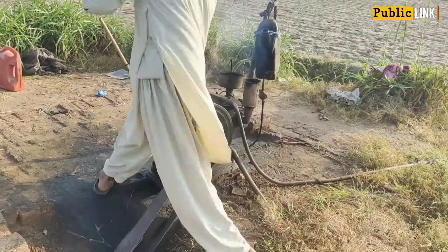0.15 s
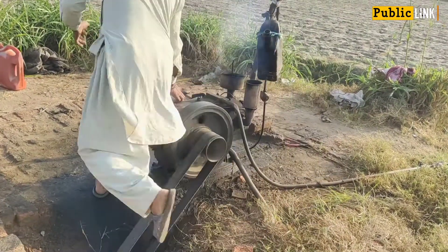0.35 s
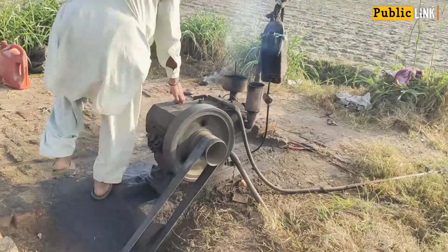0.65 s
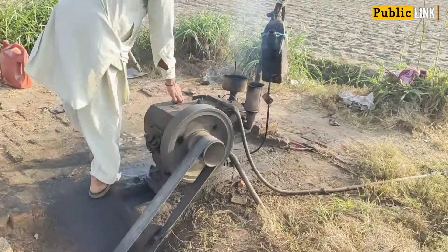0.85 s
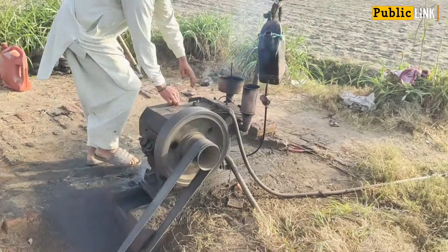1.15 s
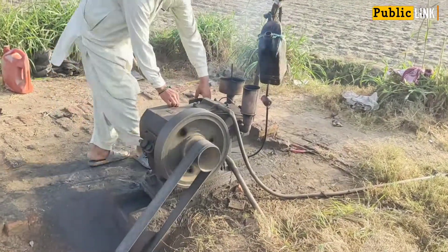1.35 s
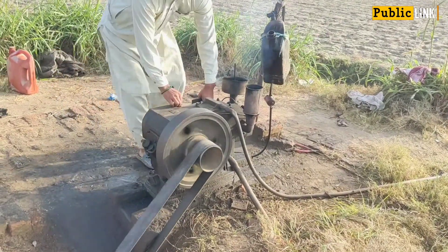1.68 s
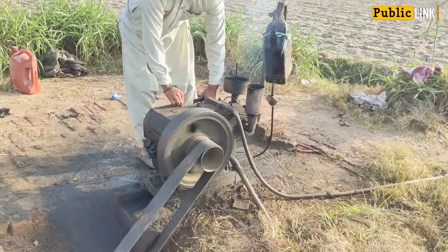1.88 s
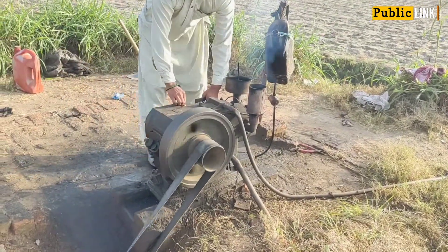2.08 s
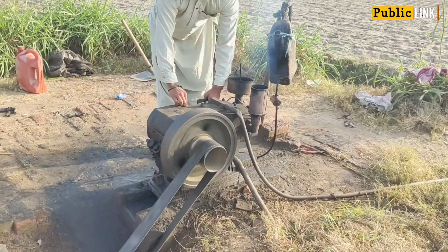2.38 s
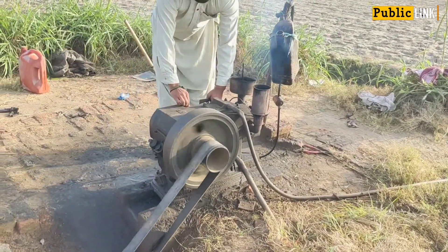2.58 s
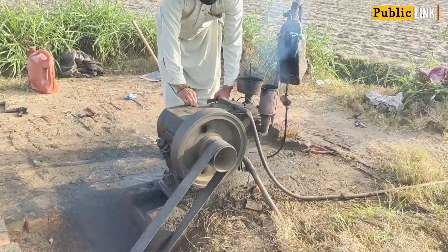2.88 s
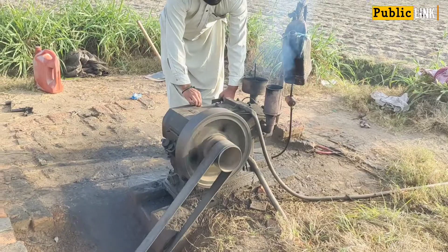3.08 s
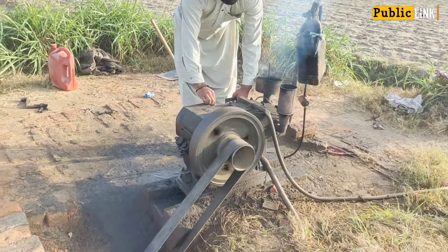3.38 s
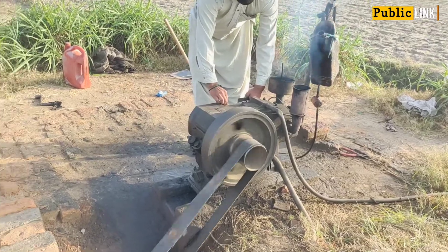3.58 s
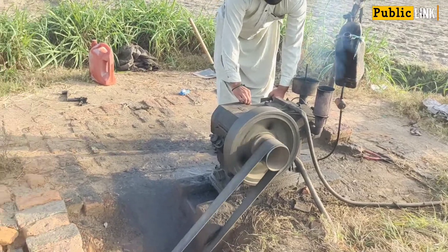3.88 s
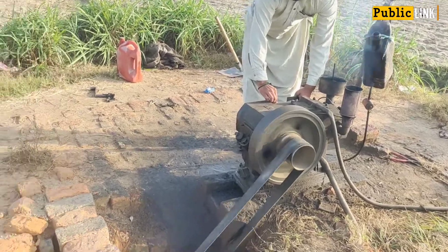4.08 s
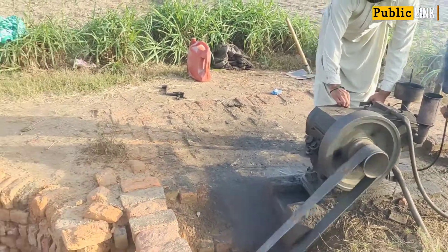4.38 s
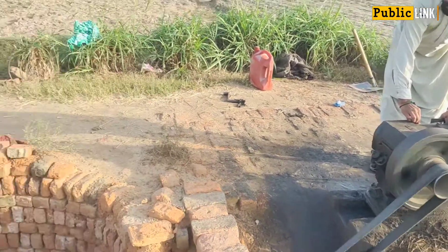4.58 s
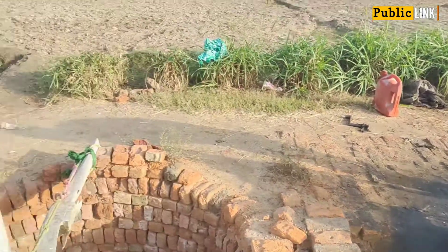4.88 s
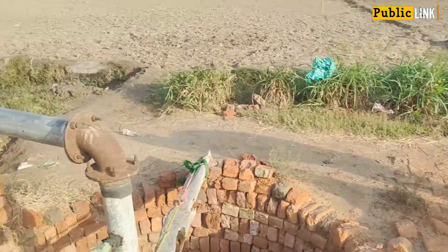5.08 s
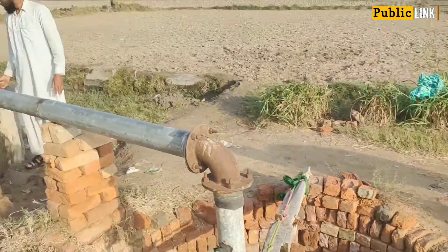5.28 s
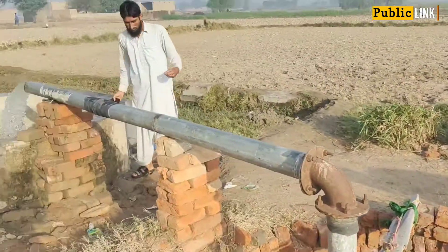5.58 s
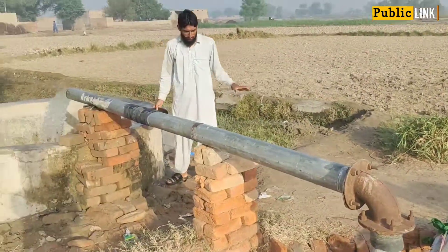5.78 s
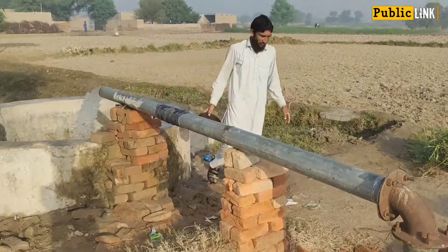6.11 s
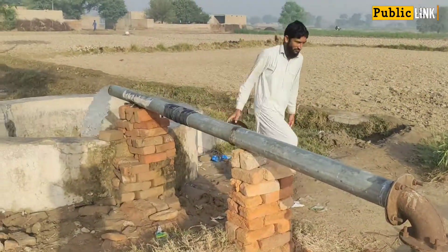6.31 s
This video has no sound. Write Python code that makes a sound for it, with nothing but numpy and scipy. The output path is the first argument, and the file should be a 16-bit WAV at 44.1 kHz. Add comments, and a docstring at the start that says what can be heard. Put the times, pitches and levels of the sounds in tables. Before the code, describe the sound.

Rapid, hollow exhaust barks from an old farm diesel, with iron rattle, thin belt squeals and clacks, then water splashing into a basin.

```python
"""A rapid exhaust beat is heard first: a single-cylinder four-stroke diesel fires nine to ten times a second.
Each cycle rings damped modes at set crank angles: bark, boom, second puff, gulp and knock, with iron clatter.
In an open field it drives a well pump by a flat belt, which squeals as narrow-band noise and clacks at its joints.
The listener walks past the engine to the well, where water pours out as grainy noise.
The right microphone is almost dead, picking up a faint coloured leak, its own noise and early bumps."""
import sys
import numpy as np
from scipy import signal
from scipy.fft import rfft, irfft, next_fast_len
from scipy.io import wavfile
from scipy.ndimage import uniform_filter1d

SR = 44100
rng = np.random.default_rng(int(sys.argv[2]) if len(sys.argv) > 2 else 0)


def to_wav(sig):
    """Store sig (one row per channel, or 1-D mono) as 16-bit WAV at the path in sys.argv[1].

    Samples outside -1..1 are clipped; the rate is SR.
    """
    pcm = np.clip(np.atleast_2d(sig), -1, 1) * 32767
    pcm = np.round(pcm).astype(np.int16)
    wavfile.write(sys.argv[1], SR, pcm.T)  # frames by channels


N = 284445

# Engine speed, with the throttle opened in two pushes and a slight slowing after: t/s, rate/(firings per s)
SPEED = [(0.0, 8.8728), (1.3, 8.8727), (2.35, 9.2902), (2.8, 9.4223), (3.1, 9.7085), (4.2, 9.9512),
         (5.0, 9.9317), (6.45, 9.3805)]


def crank_cycle():
    """Phase is the integral of frequency: engine cycles completed, with exhaust opening near whole numbers."""
    start_cycle = -.6846
    return start_cycle + np.cumsum(in_time(SPEED)[0]) / SR


# Hardest firings, before each sound's own weighting: t/s, bark level/dB, blast level/dB, jet level/dB
HARD_FIRINGS = [(0.303, 2, 2.1, 1.3), (0.528, 3.5, 1.5, 2.6), (0.866, -0.5, 0.99, 3),
                (0.979, 5.5, 1.8, 0.88), (1.652, 5, 2.2, 1.8), (1.873, 4, 3.4, 5.7), (1.983, 2, 5.2, 3),
                (2.843, 1.5, 0.76, 5.4), (2.948, 2.5, 2, 2.0), (3.052, 3, 2.2, 5.2), (3.666, 0.5, 2.3, 2.7),
                (3.97, 2, 9.5, 3.3), (4.273, 0.5, 4.8, 0.1), (4.474, 1.3, 5.3, 1.3),
                (4.675, -1.5, 6.8, 1.4), (4.775, 0, 3.9, 3.4), (5.485, 5.5, 4, 2.3), (5.898, 2.5, 2.2, 4.8),
                (6.108, 4.5, 5, 2.6), (6.425, 2.1, 1.6, 0.9)]


def hard_firings(cycle):
    """Cyclic variation of combustion: extra dB of bark, blast and jet held through each hard cycle."""
    number = np.floor(cycle + .1).astype(int)   # each hold begins just ahead of the exhaust opening
    s, *extra_db = np.transpose(HARD_FIRINGS)
    by_cycle = np.zeros((len(extra_db), number.max() + 2))
    by_cycle[:, number[(s * SR).astype(int)]] = extra_db
    return by_cycle[:, number]


def stroke(cycle, angle, modes, level_db, uneven_db):
    """Impulsive excitation of damped modes: once a cycle a gas pulse rings them, never twice alike."""
    pitch_scatter = 0.025    # standard deviation as a share of the pitch
    steady_t60_s = 0.044     # longer modes scatter less
    mode_uneven_db = 1.5
    at = np.flatnonzero(np.diff(np.floor(cycle - angle)) > 0)
    chance = rng.uniform(-1, 1, 128)[:len(at)]
    force_db = np.broadcast_to(level_db, N)[at] + uneven_db * chance
    out = np.zeros(N + SR)
    for hz, t60, *place_db in modes:
        age = np.arange(int(min(t60, .5) * SR)) / SR
        detune, own = rng.standard_normal((2, 128))[:, :len(at)]
        gains = from_db(force_db + mode_uneven_db * own + np.interp(at / SR, PLACES, place_db))
        decay = from_db(-60 * age / t60)
        pitches = hz * (1 + pitch_scatter * min(1, steady_t60_s / t60) * detune)
        for i, gain, pitch in zip(at, gains, pitches):
            out[i:i + len(age)] += gain * decay * np.sin(2 * np.pi * pitch * age)
    return out[:N]


# Modes of each stroke, relative to that stroke's level: f/Hz, t60/s, then level/dB at each of the four places
# exhaust valve opens
BARK = [(104.7, 0.11, -15.5, -12.5, -13, -13.5), (171.6, 0.053, -14.5, -15, -13.5, -9.5),
        (273.5, 0.029, -14, -7.5, -5, -9), (438, 0.018, -15.5, -14.5, -13.5, -17),
        (561, 0.026, -16, -8.5, -17.5, -35.5), (524, 0.024, -36, -25.5, -14, -12),
        (627, 0.0082, -21, -11, -41, -29.5), (840, 0.024, -17.5, -13, -12.5, -46)]
# silencer
BOOM = [(81.6, 0.085, -32.5, -37, -36, -25.5), (140.5, 0.046, -22.5, -15, -14.5, -23.5),
        (274, 0.055, -36, -27, -40, -32)]
# ring left by the second puff
PUFF = [(168.3, 0.077, -21, -26, -21.5, -16), (249.2, 0.2, -41, -28.5, -24.5, -33.5),
        (433, 0.093, -23, -21, -31.5, -25)]
# air intake
GULP = [(188.5, 0.17, -42, -75, -35, -25), (236, 0.026, -23, -15.5, -13.5, -17),
        (440, 0.054, -35, -40, -29, -47), (626, 0.051, -22, -17, -19.5, -21)]
# combustion
KNOCK = [(158.4, 0.056, -26.5, -20, -20.5, -18.5), (382, 0.025, -21.5, -29, -41, -21),
         (784, 0.048, -23, -18.5, -19.5, -22.5)]


def gas_pulses(cycle, bark_db):
    """Superposition of five modal strokes; gradual valve opening low-passes each pulse."""
    bark = stroke(cycle, -0.0092, BARK, level_db=0.67 * bark_db - 0.5, uneven_db=-0.9)
    boom = -stroke(cycle, 0.1275, BOOM, level_db=4.5, uneven_db=1.0)   # suction behind the gas slug
    puff = stroke(cycle, .2663, PUFF, level_db=1.32, uneven_db=-2.1)
    gulp = stroke(cycle, .556, GULP, level_db=2.5, uneven_db=2.0)
    knock = stroke(cycle, .735, KNOCK, level_db=1.0, uneven_db=2.0)
    rounded = cut(bark + boom + puff + gulp + knock, 832, "low", order=4)
    # a narrow pipe radiates almost no deep bass
    high_pass = signal.cheby2(4, 34, 37, "high", fs=SR, output="sos")
    return signal.sosfilt(high_pass, rounded)


def silencer(x, hz, width_hz):
    """All-pass group delay: the can holds back sound near its resonance for about four milliseconds."""
    b, a = signal.iirpeak(hz, hz / width_hz, fs=SR)
    return x - 2 * signal.lfilter(b, a, x)


# Spectrum of the second puff's smooth pulse: f/Hz, level/dB
PUFF_COLOUR = [(60, -21), (150, -1.5), (500, 2), (780, -0.5), (900, -7), (1100, -22.5), (1500, -31.5)]
# Drive of that pulse at the four places: level/dB
PUFF_DB = [19.6, 22.55, 21.3, 22.5]


def second_puff(cycle, angle, uneven_db):
    """Open-end reflection: the piston pushes out the remaining gas in a pulse that bounces twice in the pipe."""
    clicks = np.append(np.diff(np.floor(cycle - angle)), 0)
    drive = from_db(along_walk(PUFF_DB) + uneven_db * drift(9.2))
    pulse = colour(clicks * drive, PUFF_COLOUR)
    trip_s = 0.003225 * (1 + 0.033 * drift(10))   # mean round trip; the gas is never equally hot
    first_return = -0.91 * delayed(pulse, trip_s)   # inverted by the open end
    second_return = 0.25 * delayed(pulse, 2 * trip_s)
    return pulse + first_return + second_return


# Turbulence spectrum: f/Hz, level/dB per Hz (relative)
RUMBLE_COLOUR = [(25, -18), (42, -32), (65, -22), (120, 8), (180, -4.5), (330, 3.5), (600, -4.5),
                 (850, -5.5), (1100, -14), (1500, -25)]
# Turbulence at the four places: level/dB
RUMBLE_DB = [-30, -29.5, -30.5, -28]


def rumble(cycle):
    """Turbulent flow noise: broadband grains in the pipe, strongest behind the bark."""
    envelope = 5.5 + 2.2 * burst(cycle, 0, 0.2, uneven_db=-2.0)
    return from_db(along_walk(RUMBLE_DB)) * grains(RUMBLE_COLOUR, envelope, grain_db=1.6)


# Short flutter between nearby surfaces along the walk: t/s, delay/s, share reflected
FLUTTER = [(1.0, 0.0022, 0.46), (3.3, 0.002, 0.29), (4.2, 0.0016, 0.12), (4.8, 0.0013, 0.25),
           (5.4, 0.00093, 0.5), (5.9, 0.00088, 0.59), (6.45, 0.00081, 0.61)]


def flutter(x):
    """Comb filtering: quick inverted echoes make a hollow honk that rises as their path shortens."""
    delay, share = in_time(FLUTTER)
    samples, echo, out = np.arange(N), x, x
    for _ in range(12):
        echo = -np.clip(share, 0, .85) * np.interp(samples - delay * SR, samples, echo)
        out = out + echo
    return out


# Dulling of the bark's top on the way to the outlet: t/s, share of the band removed
SHADE = [(4.9, 0.17), (5.5, 0.36), (6.0, 0.79), (6.45, 1)]


def shade(x, hz, width_hz):
    """Band rejection: away from the pipe's mouth the top of the bark is lost."""
    b, a = signal.iirpeak(hz, hz / width_hz, fs=SR)
    return x - np.clip(in_time(SHADE)[0], 0, 1) * signal.lfilter(b, a, x)


# Silencer can and pipe: f/Hz, width of one filter pass/Hz, then level/dB at each of the four places
HUM = [(166, 24, -41.5, -42, -47, -51.5), (257.1, 13.4, -55, -35.5, -38, -45.5),
       (478, 54, -63, -60, -43.5, -46), (665, 52, -46, -42, -51, -40.5)]


def hum():
    """Sustained resonance: narrow noise of the silencer can and its pipe bridges the strokes."""
    return placed_noise(HUM)


def stack_clang(cycle, blast_db):
    """Resonant excitation: a short metallic note of the exhaust stack, clear only under a hard blast."""
    level_db = along_walk([-51, -41.5, -43, -41.5]) + blast_db
    envelope = burst(cycle, 0.024, 0.028, uneven_db=-5.5)
    return from_db(level_db) * envelope * narrow_noise(1814, 160)


# Spectrum of the gas jet: f/Hz, level/dB per Hz (relative)
SIZZLE_COLOUR = [(5000, 2), (6200, -7.5), (7600, -1), (8400, -8.5), (10000, 4.5), (11500, 5.5), (13000, 1),
                 (15500, -1.5)]
# Jet at the four places, before 4 dB is added: level/dB
SIZZLE_DB = [-72.5, -65.5, -68.5, -73.5]


def sizzle(cycle, jet_db):
    """Jet noise: the gas hisses and ticks after the exhaust opens, whistles at the lip and spits when hard."""
    blast = 1.05 * from_db(1.5 * jet_db) * burst(cycle, 0.0044, 0.047, uneven_db=-0.9) ** 2
    firing = 0.15 * burst(cycle, 0.76, 0.036, uneven_db=3.0)
    jet = 0.47 + blast + firing
    smooth_jet = uniform_filter1d(jet, size=220)
    hiss = grains(SIZZLE_COLOUR, smooth_jet * from_db(1.2 * drift(120)), grain_db=1.5)
    # soot and oil drops tick in the jet
    drops = sparse_clicks(per_s=120, weight=jet ** 2, spread_db=4)
    ticks = from_db(-7) * rms_one(colour(drops, SIZZLE_COLOUR))
    lip = burst(cycle, 0, 0.098, uneven_db=7.5) * narrow_noise(12200, 200)
    whistle = from_db(-14) * rms_one(lip)   # thin note at the pipe's lip
    level = from_db(along_walk(SIZZLE_DB) + 4.0 + drift(10))
    return level * (iron(hiss + ticks, t60=0.0099, ring_db=-1.0) + whistle)


# Bursts of second puff, valve seating, injection and firing: start/cycles, rise/cycles, level/dB
CLATTER = [(0.247, 0.036, 0), (.35, 0.031, -1), (.785, 0.02, 6)]
# Clatter spectrum: f/Hz, level/dB per Hz (relative)
CLATTER_COLOUR = [(500, 3), (900, 6.5), (1300, -11.5), (2000, -7.5), (3000, -13), (4300, -22),
                  (5800, -35.5), (8000, -37)]
# Clatter at the four places, before 10 dB is added: level/dB
CLATTER_DB = [-51.5, -47.5, -48, -50]
# Engine block and tinware: f/Hz, width of one filter pass/Hz, then level/dB at each of the four places
BLOCK = [(1007, 110, -47.5, -42, -40.5, -48), (1280, 110, -51, -56, -42.5, -48),
         (1582, 150, -51, -41.5, -49, -46.5)]


def machinery(cycle, blast_db):
    """Structure-borne sound: gears rattle throughout; blast, valves and firing shake the iron and the block."""
    blast = from_db(0.65 * blast_db + 8.0) * burst(cycle, 0.0038, 0.045, uneven_db=1.28) ** 2
    power = 1 + blast ** 2   # 1 is the steady gear rattle
    for angle, rise, db in CLATTER:
        power = power + (from_db(db) * burst(cycle, angle, rise, uneven_db=1.0)) ** 2
    shake = np.sqrt(power)
    level = from_db(along_walk(CLATTER_DB) + 10.0 + 0.37 * drift(7.9) + 1.27 * drift(110))
    rattle = grains(CLATTER_COLOUR, shake, grain_db=-0.5)
    clatter = level * patchy(rattle, patchy_db=2.5, rate=120)
    block = rms_one(shake) * placed_noise(BLOCK)
    return iron(clatter, t60=0.034, ring_db=-5.5) + block + tinware(shake)


# Spectrum of the tinware: f/Hz, level/dB
TINWARE_COLOUR = [(850, -5), (1200, -0.5), (1900, -3.5), (2800, -11), (4000, -18)]
# Tinware at the four places: level/dB
TINWARE_DB = [-47, -43.5, -38.5, -41.5]


def tinware(shake):
    """Random impacts on free resonators: each knock, likelier under hard shaking, rings one small part."""
    clicks = sparse_clicks(per_s=200, weight=shake, spread_db=2.6) * np.sqrt(shake)
    pitches = np.geomspace(880, 4000, 28)   # Hz
    part = rng.integers(0, len(pitches), N)
    rings = sum(ring(clicks * (part == k), hz, t60=37 / hz) for k, hz in enumerate(pitches))
    return from_db(along_walk(TINWARE_DB)) * rms_one(colour(rings, TINWARE_COLOUR))


# Small steel part shaken hard, before its envelope and modes: t/s, level/dB
PINGS = [(1.873, -60), (1.984, -56), (2.631, -57), (2.738, -55), (2.775, -57), (2.843, -53), (2.95, -61),
         (3.054, -53), (3.36, -51), (3.463, -59), (3.611, -55), (3.666, -56), (3.971, -59), (4.074, -56),
         (4.274, -59), (4.375, -58), (4.776, -60)]
# Its modes: f/Hz, width of one filter pass/Hz, level/dB
PING_MODES = [(10300, 350, 1.5), (11100, 350, 1), (12900, 500, -5)]


def pings():
    """Transient resonance: narrow noise in brief strokes gives short, high metallic shivers."""
    modes = sum(from_db(db) * narrow_noise(hz, width) for hz, width, db in PING_MODES)
    return strikes(PINGS, rise=.003, decay=0.0077) * modes


# Belt squeal: f/Hz, width of one filter pass/Hz, level/dB (relative), share of the swell that it follows
SQUEAL = [(4505, 200, 1.5, .2), (5840, 83, -12, 0.7), (7770, 220, -14.5, 0.69), (9320, 250, -7, 0.4),
          (11800, 360, -5, 0.74), (12090, 150, -8, 0.72)]
# Squeal at the four places: level/dB
SQUEAL_DB = [-71.5, -72, -71.5, -86]
# Belt slips: start t/s, length/s, swell above the steady level/dB before each squeal's share
SLIPS = [(0.047, 0.24, 12.5), (0.677, 0.047, 14), (0.8, 0.26, 13), (1.19, .12, 9), (1.587, .11, 4),
         (1.76, 0.13, 5), (2.45, 0.36, 12.5), (3.05, 0.17, 9), (3.35, 0.36, 5), (3.68, .12, 8),
         (4.142, 0.19, 10), (4.776, .12, 4), (5.2, .2, 6), (5.46, .12, 16)]


def belt():
    """Frictional squeal: thin notes, each fluttering on its own, swell whenever the belt slips."""
    t = np.arange(N) / SR
    edge_s = .03
    swell_db = np.zeros(N)
    for start, length, db in SLIPS:
        inside_s = np.minimum(t - start, start + length - t)
        swell_db += db * np.clip(.5 + inside_s / edge_s, 0, 1)
    squeals = np.zeros(N)
    for hz, width, db, follows in SQUEAL:
        level_db = db + follows * swell_db + 3.5 * drift(28)
        squeals += from_db(level_db) * narrow_noise(hz, width)
    return from_db(along_walk(SQUEAL_DB)) * squeals


# Joints slapping on to the pulley and off again, about every fourth cycle, before the envelope: t/s, level/dB
CLACKS = [(.159, -28), (.612, -25), (1.025, -29.5), (1.063, -26.5), (1.482, -29.5), (1.525, -33),
          (1.92, -28.5), (1.957, -25.5), (2.394, -26.5), (2.784, -26), (2.819, -25), (3.196, -30),
          (3.241, -27), (3.612, -27), (3.646, -26), (4.053, -27), (4.42, -30.5), (4.455, -25),
          (5.266, -24.5), (5.644, -27.5), (5.979, -34), (6.059, -28.5), (6.096, -24.5)]
# Rattle spectrum: f/Hz, level/dB per Hz (relative)
RATTLE_COLOUR = [(1000, 8.5), (1900, 7), (2800, -0.5), (4300, -7), (6000, -25), (9000, -24.5)]


def belt_joints():
    """Impact noise: each joint rattles raggedly over the pulley."""
    rattle = patchy(grains(RATTLE_COLOUR, 1, grain_db=1.0), patchy_db=4.0, rate=45)
    clacks = strikes(CLACKS, rise=0.0044, decay=0.0095) * rattle
    return iron(clacks, t60=0.021, ring_db=-6.0)


# Water spectrum: f/Hz, level/dB per Hz (relative)
WATER_COLOUR = [(300, -13), (700, 23.5), (1500, 16.5), (2500, 3), (4500, -51), (9000, -51)]
# Water at the four places: level/dB
WATER_DB = [-62, -54, -46.5, -38]


def water():
    """Splash noise: the jet falls into the basin as many uneven grains."""
    splash = grains(WATER_COLOUR, from_db(0.9 * drift(40)), grain_db=2.0)
    return from_db(along_walk(WATER_DB)) * splash


def yard(x, t60, wet_db):
    """Diffuse scattering: earth, bricks and crops return a short dull tail."""
    age = np.arange(SR // 4) / SR
    tail = rng.standard_normal(len(age)) * from_db(-60 * age / t60) * (age > .003)
    scattered = signal.fftconvolve(x, tail / np.linalg.norm(tail))[:N]
    return from_db(wet_db) * cut(cut(scattered, 510, "high"), 1060, "low", order=4)


# Touches on the right microphone, as click sizes: t/s, level/dB
BUMPS = [(.017, -14), (0.61, -15.5), (0.713, -31)]


def bumps():
    """Impulse response: a touch on the microphone gives a dull damped thud and a short rub."""
    clicks = np.zeros(N)
    for s, db in BUMPS:
        clicks[int(s * SR)] = from_db(db)
    thud = cut(ring(clicks, 170, 0.021), 90, "high", order=1) + .5 * ring(clicks, 390, 0.0067)
    fading = signal.lfilter([1], [1, -np.exp(-1 / (0.06 * SR))], clicks + 1e-18)
    rub = fading * rms_one(cut(rng.standard_normal(N), 220, "low", order=1))
    return -1.6 * thud + from_db(-33.0) * rub


# Response of the weak right microphone to the left sound: f/Hz, level/dB
LEAK = [(40, -54), (150, -48), (500, -47), (800, -40), (1200, -54), (1700, -26), (3000, -40), (6000, -46),
        (15000, -17)]
# Its own noise spectrum: f/Hz, level/dB (relative)
MIC_NOISE = [(25, 10), (100, 15.5), (300, 12), (700, 10), (3000, 10), (6000, 1.5), (15000, -0.5)]


def weak_microphone(left):
    """Transducer response and self-noise: a faint coloured copy, steady noise and the bumps."""
    own_noise = from_db(-62.0) * rms_one(colour(rng.standard_normal(N), MIC_NOISE))
    return colour(left, LEAK) + own_noise + bumps()


# Moments of passing the four places (behind the operator, facing the engine, well rim, outlet pipe): t/s
PLACES = [1.0, 3.4, 4.8, 5.9]


def along_walk(place_db):
    """Position-dependent level: linear interpolation in dB from one place to the next."""
    return np.interp(np.arange(N) / SR, PLACES, place_db)


def placed_noise(modes):
    """Superposed resonances: narrow noises, each with its own level along the walk."""
    return sum(from_db(along_walk(place_db)) * narrow_noise(hz, width) for hz, width, *place_db in modes)


def burst(cycle, angle, rise, uneven_db):
    """Periodic envelope: it swells and dies once a cycle, with a new height each time."""
    age = (cycle - angle) % 1 / rise
    height_db = uneven_db * rng.standard_normal(128)[np.floor(cycle - angle).astype(int)]
    return age * np.exp(1 - age) * from_db(height_db)


def strikes(rows, rise, decay):
    """Transient envelope: single hits with exponential rise and decay in seconds."""
    out, age = np.zeros(N + SR // 10), np.arange(SR // 10) / SR
    shape = (1 - np.exp(-age / rise)) * np.exp(-age / decay)
    for s, db in rows:
        at = int(s * SR)
        out[at:at + len(age)] += from_db(db) * shape
    return out[:N]


def sparse_clicks(per_s, weight, spread_db):
    """Inhomogeneous random impulses: uneven clicks, more frequent where the weight is high."""
    born = rng.random(N) < per_s * weight / np.mean(weight) / SR
    sign = rng.choice([-1, 1], N)
    return born * sign * from_db(spread_db * np.minimum(rng.exponential(1, N), 3))


def grains(points, envelope, grain_db):
    """Amplitude-modulated noise: grains of about a millisecond and uneven size, at unit power."""
    return rms_one(colour(rng.standard_normal(N) * envelope * from_db(grain_db * drift(700)), points))


def iron(x, t60, ring_db):
    """High modal density: briefly ringing modes of castings and tinware, with the broad colour kept."""
    age = np.arange(SR // 10) / SR
    modes = rng.standard_normal(len(age)) * from_db(-60 * age / t60)
    response = 1 + from_db(ring_db) * rfft(modes / np.linalg.norm(modes), 2 * N)
    broad = np.sqrt(uniform_filter1d(np.abs(response) ** 2, size=N // 40))
    return irfft(rfft(x, 2 * N) * response / broad)[:N]


def patchy(x, patchy_db, rate):
    """Independent band modulation: parts take turns as third-octave bands swell and fade on their own."""
    size = next_fast_len(N)
    # the end bands take in everything below and above
    third = np.clip(3 * np.log2(np.fft.rfftfreq(size, 1 / SR) + 1), 27, 37)
    spectrum = rfft(x, size)
    out = np.zeros(N)
    for k in range(27, 38):
        band = irfft(spectrum * np.maximum(0, 1 - abs(third - k)), size)[:N]
        out += band * from_db(patchy_db * drift(rate))
    return rms_one(out)


def narrow_noise(hz, width_hz):
    """Resonant filtering: noise at unit power, passed twice through a peak for steep skirts."""
    b, a = signal.iirpeak(hz, hz / width_hz, fs=SR)
    return rms_one(signal.lfilter(b, a, signal.lfilter(b, a, rng.standard_normal(N))))


def ring(clicks, hz, t60):
    """Damped oscillator: a unit click starts a decaying sine of initial height 1."""
    r, w = from_db(-60 / (t60 * SR)), 2 * np.pi * hz / SR
    return signal.lfilter([0, np.sin(w)], [1, -2 * r * np.cos(w), r * r], clicks + 1e-18)


def delayed(x, delay_s):
    """Propagation delay: the same sound a little later."""
    return np.interp(np.arange(N) - delay_s * SR, np.arange(N), x, left=0)


def drift(rate):
    """Random modulation: normal values, rate of them a second, joined by lines and scaled to unit power."""
    steps = np.arange(N) * rate / SR
    return rms_one(np.interp(steps, np.arange(N), rng.standard_normal(N)))


def colour(x, points):
    """Spectral shaping: a smooth response that falls 20 dB an octave beyond its ends."""
    hz, db = np.transpose(points)
    octave, known = np.log2(np.fft.rfftfreq(2 * N, 1 / SR) + 1), np.log2(hz)
    beyond = np.abs(octave - np.clip(octave, known[0], known[-1]))
    gain = from_db(np.interp(octave, known, db) - 20 * beyond)
    return irfft(rfft(x, 2 * N) * gain)[:N]


def cut(x, hz, kind, order=2):
    """Maximally flat filtering: Butterworth low- or high-pass."""
    return signal.sosfilt(signal.butter(order, hz, kind, fs=SR, output="sos"), x)


def in_time(rows):
    """Linear interpolation: the columns of a curve at every sample."""
    s, *columns = np.transpose(rows)
    return [np.interp(np.arange(N) / SR, s, c) for c in columns]


def from_db(db):
    """Logarithmic level: decibels to amplitude gain."""
    return 10 ** (np.asarray(db) / 20)


def rms_one(x):
    """Power normalization: scale to a root mean square of 1."""
    return x / np.sqrt(np.mean(x ** 2) + 1e-20)


def scene():
    """Superposition: the crank angle times the engine's strokes; the right channel gets only a weak pickup."""
    cycle = crank_cycle()
    bark_db, blast_db, jet_db = hard_firings(cycle)
    pulses = silencer(gas_pulses(cycle, bark_db), hz=731, width_hz=146)
    pulses = pulses + second_puff(cycle, angle=.272, uneven_db=1.38)
    exhaust = shade(flutter(pulses + rumble(cycle)), hz=826, width_hz=264) + hum()
    left = exhaust + yard(exhaust, t60=0.11, wet_db=-11.5)
    left = left + machinery(cycle, blast_db) + belt_joints()
    left = left + sizzle(cycle, jet_db) + stack_clang(cycle, blast_db) + pings()
    left = left + belt() + water()
    return np.array([left, weak_microphone(left)])


def record(dry):
    """Band limitation: an elliptic low-pass cuts the top steeply at 15750 Hz."""
    return signal.sosfilt(signal.ellip(10, .1, 80, 15750, fs=SR, output="sos"), dry)


dry = scene()
out = record(dry)
to_wav(out)
```